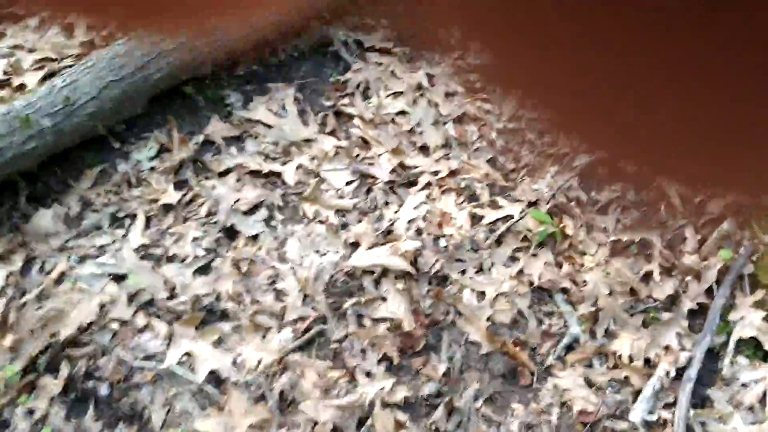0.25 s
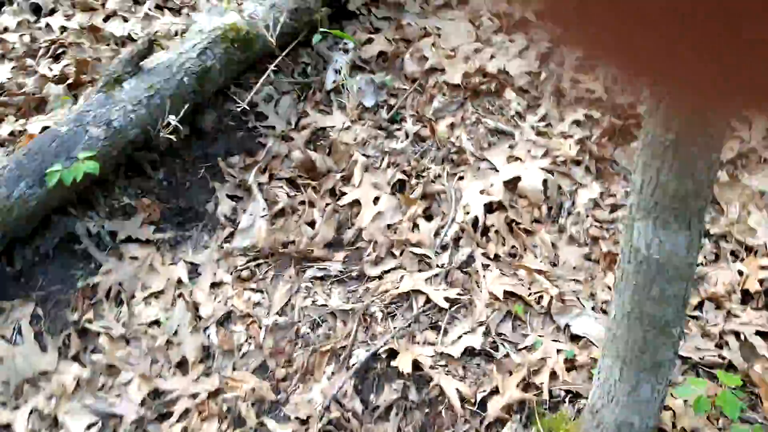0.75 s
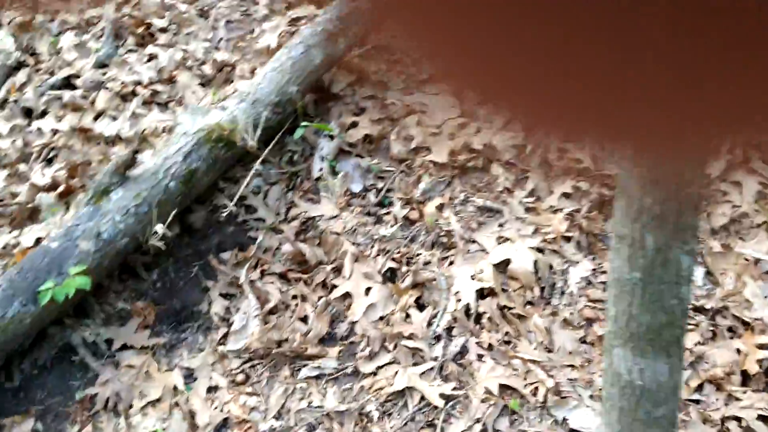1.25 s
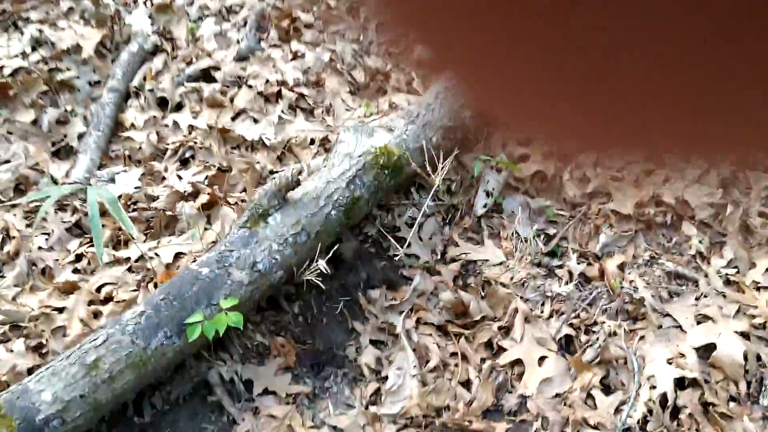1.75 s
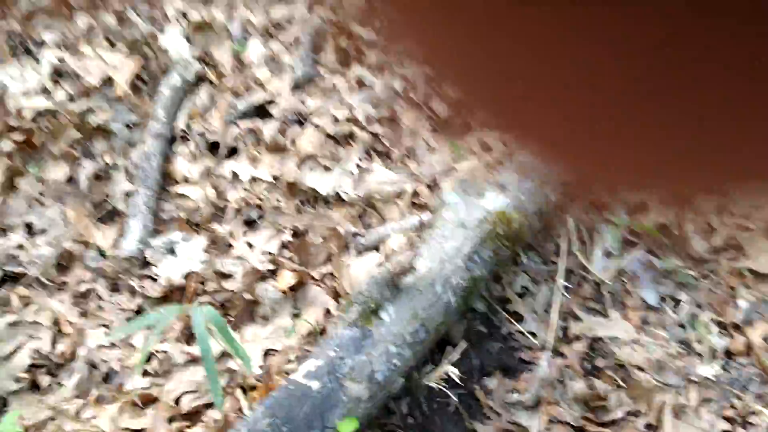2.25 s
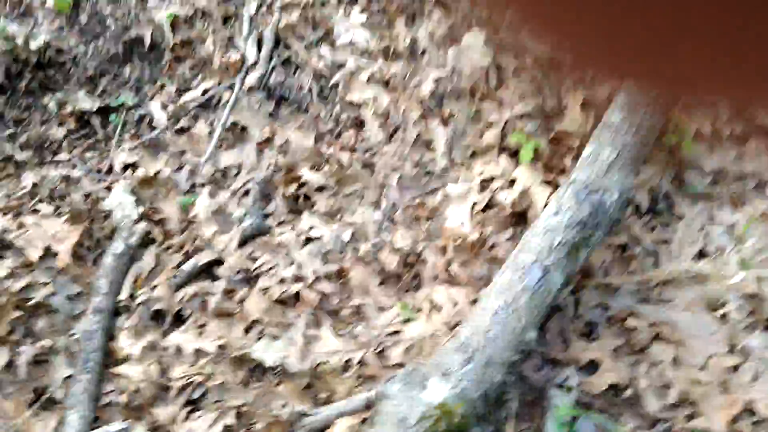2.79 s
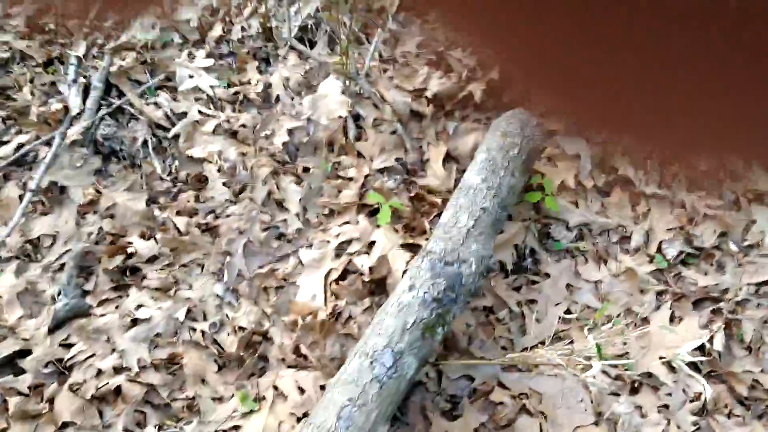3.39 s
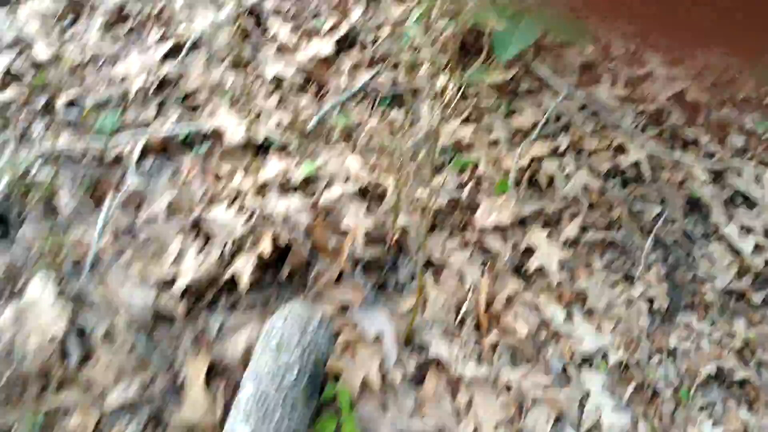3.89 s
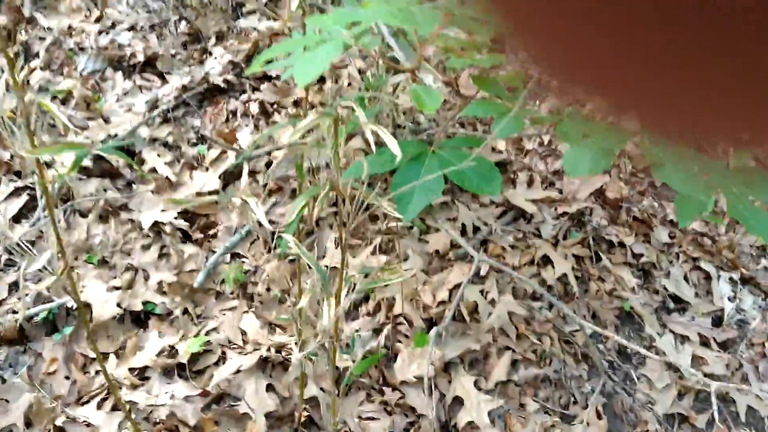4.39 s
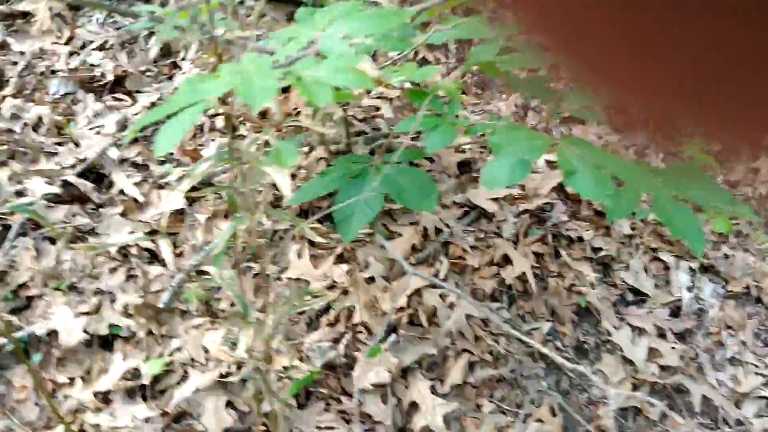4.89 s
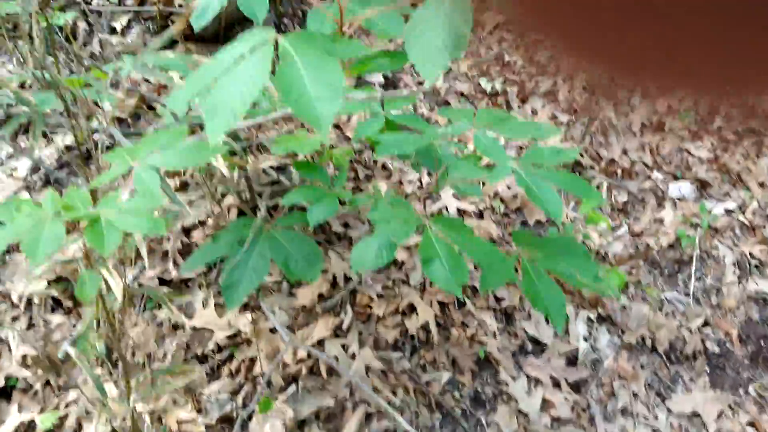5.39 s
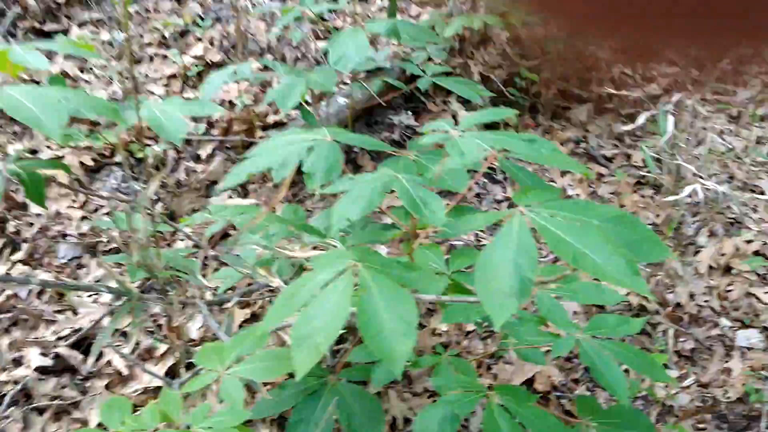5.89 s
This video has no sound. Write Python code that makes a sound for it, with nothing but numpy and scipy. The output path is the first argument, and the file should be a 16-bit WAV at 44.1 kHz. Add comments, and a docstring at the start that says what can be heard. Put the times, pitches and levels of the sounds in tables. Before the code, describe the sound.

In a quiet wood, a handheld stereo microphone closely catches footsteps in dry leaves. From 0 to 0.45 seconds there are only faint crackles and small snaps. At about 0.6 to 0.85 the loudest crunch bursts out in two or three dense surges, with a dull knock beneath. It eases through a softer crunch near 1.0 and dwindles by 1.4. From 1.6 to 2.1 a longer dragging crunch swells, with bright sharp snaps near 1.96, then fades. A short crunch comes at 2.65. After that, thin, fizzy rustles and ticks continue, with a small step and low thud at 3.6. A brief crisp crunch lands at 4.76, a dull knock at 5.07, then sparse crackling until about 6.1. Very faint low rumble, airy hiss and wavering distant hums stay underneath; the dry sound has only a tiny scattered tail.

```python
"""On a wooded slope, someone walks through dry leaf litter, holding a small pair of microphone ports.
Each step is a dense crackle of short noise bursts, with larger single snaps and dull shoe knocks on top.
A faint scattered tail follows the steps, and low rumble shakes with them.
Behind lie steady noise, for far rumble and the hiss of the wood, and faint wavering hums."""
import sys
import numpy as np
from scipy import signal
from scipy.fft import rfft, irfft
from scipy.io import wavfile
from scipy.ndimage import uniform_filter1d

SR = 44100
rng = np.random.default_rng(int(sys.argv[2]) if len(sys.argv) > 2 else 0)


def inscribe(sig):
    """Save sig as 16-bit PCM at rate SR to the path in sys.argv[1].

    A 1-D sig is mono; a 2-D sig holds one channel per row.
    Samples are clipped to [-1, 1] before scaling.
    """
    pcm = np.round(np.clip(np.atleast_2d(sig).T, -1, 1) * 32767)
    wavfile.write(sys.argv[1], SR, pcm.astype(np.int16))


def volts_from_decibels(level):
    """Turn decibel levels (scalar or array-like) into linear amplitude factors."""
    exponent = np.asarray(level, float) / 20
    return 10 ** exponent


N = 271126  # length in samples


def evened(x):
    """Scales a signal to an rms of 1."""
    return x / np.sqrt(np.mean(x ** 2) + 1e-20)


def read(points, hz):
    """Looks up a table of (Hz, value) on a log frequency axis."""
    table_hz, value = np.transpose(points)
    return np.interp(np.log(hz + 1), np.log(table_hz + 1), value)


def bump(hz, centre_hz, width):
    """A bell of height 1 on a log frequency axis; width is in natural-log units."""
    return np.exp(-(np.log((hz + 1) / centre_hz) / width) ** 2)


def partly_alike(first, second, share):
    """Mixes two independent noises into a left and right pair that share part of their sound."""
    return np.stack([first, share * first + np.sqrt(1 - share ** 2) * second])


# The colour of the steady background. Each row: frequency in Hz, relative level in dB per Hz.
WOOD_COLOUR = [(24, -30), (40, -10), (131, 1), (316, -2.5), (865, -7.5), (957, -11), (1030, -11.5),
               (1540, -14), (3830, -16.5), (5440, -24.5), (7010, -20), (15300, -38), (16500, -51)]
# How alike the background is left and right. Each row: frequency in Hz, likeness from 0 to 1.
WOOD_LIKENESS = [(60, 0.86), (200, 0.97), (600, 0.39), (1400, .1), (16000, 0.022)]


def wood(level_db=-68.5, patchy_db=2.0):
    """Steady rumble and hiss: noise shaped by frequency, near mono in the bass, slightly patchy."""
    frames, hz = N // 512 + 5, np.fft.rfftfreq(2048, 1 / SR)
    a, b, c, d, patches = rng.standard_normal((frames, 1025, 5)).T
    patches = uniform_filter1d(patches, 20, 0)  # smooth over frequency
    patches = evened(uniform_filter1d(patches, 12, 1))  # and over time
    z = partly_alike(a + 1j * b, c + 1j * d, read(WOOD_LIKENESS, hz)[:, None])
    z *= volts_from_decibels(read(WOOD_COLOUR, hz)[:, None] + patchy_db * patches)
    noise = signal.istft(z, nperseg=2048, noverlap=1536)[1][:, :N]
    lean = volts_from_decibels(np.array([[.7], [-.7]]))  # a little louder on the left
    return volts_from_decibels(level_db) * evened(noise) * lean


# Faint low tones, two steady like far engines and one that glides; one list of rows per tone.
# Each row: time in seconds, centre pitch in Hz, level in dB before the waver.
HUM_PATHS = [
    [(0.0, 97.6, -74), (0.13, 101.5, -76), (1.032, 103.2, -67.5), (1.3, 107, -85)],
    [(3.2, 148.4, -91), (3.342, 145.0, -80.5), (4.014, 149.3, -79.5), (4.9, 146.3, -82)],
    [(1.9, 337, -73), (2.012, 302.5, -68), (2.098, 434, -68), (2.42, 287.2, -91)],
]


def hums(waver_db=4.0, drift=.03):
    """Low sine tones whose level and pitch waver slowly; drift is a fraction of the pitch."""
    out, t = np.zeros(N), np.arange(N) / SR
    for rows in HUM_PATHS:
        s, hz, db = np.transpose(rows)
        fade = np.interp(t, [s[0] - .05, s[0], s[-1], s[-1] + .05], [0, 1, 1, 0])
        slow = uniform_filter1d(rng.standard_normal((2, N)), 1500, axis=1)
        slow = uniform_filter1d(slow, 900, axis=1)
        # both wavers share one scale
        level_waver, pitch_waver = evened(slow)
        pitch_hz = np.interp(t, s, hz) * (1 + drift * pitch_waver)
        tone = np.sqrt(2) * np.sin(2 * np.pi * np.cumsum(pitch_hz) / SR)
        out += fade * volts_from_decibels(np.interp(t, s, db) + waver_db * level_waver) * tone
    return out


# Each press or drag of a shoe. Each row: start of full weight in seconds, level in dB,
# rise in seconds, hold in seconds, fall in seconds. Rise and fall each span ramp_db.
SHOE_PRESSES = [(0.061, -57, .15, 0.0071, 0.084), (0.154, -57.5, 0.083, .0, 0.087),
                (0.301, -59, 0.14, 0.0082, 0.16), (0.598, -23, 0.078, 0.016, .07),
                (0.671, -29, 0.073, 0.014, 0.11), (0.782, -24.5, 0.13, .0, 0.16),
                (1.005, -40, 0.6, 0.093, 0.15), (1.166, -46.5, 0.077, .04, 0.097),
                (1.316, -48, .035, 0.0042, 0.053), (1.417, -49.5, 0.085, .0, 0.092),
                (1.626, -37, 0.097, 0.11, 0.1), (1.88, -35, 0.15, .0, 0.21), (1.974, -36.5, .15, .0, .2),
                (2.067, -35, 0.17, 0.035, 0.065), (2.156, -47, 0.11, .0, 0.051),
                (2.276, -46, 0.055, 0.0034, 0.1), (2.379, -54.5, 0.039, 0.0049, 0.093),
                (2.656, -39, 0.042, .0, 0.033), (2.707, -41, 0.082, 0.00051, 0.034),
                (2.497, -64, 0.15, 0.037, 0.15), (2.864, -54.5, 0.26, 0.03, 0.21),
                (2.94, -57.5, 0.12, 0.016, 0.11), (2.997, -56, 0.089, 0.041, 0.083),
                (3.251, -56.5, .03, 0.067, 0.14), (3.465, -64, 0.034, 0.005, .2),
                (3.608, -44, 0.1, 0.05, 0.031), (3.7, -53.5, 0.036, 0.015, 0.081),
                (3.771, -61.5, .1, 0.042, 0.072), (3.922, -58, 0.16, .1, 0.18),
                (4.178, -53.5, .1, .0, 0.087), (4.23, -60.5, 0.084, 0.015, 0.06),
                (4.762, -36, 0.044, .0, 0.059), (5.017, -52, 0.13, 0.18, .12), (5.254, -61, .1, 0, .2),
                (5.338, -63.5, 0.08, 0.017, 0.11), (5.428, -58.5, 0.16, 0.055, 0.052),
                (5.537, -61, .04, 0.018, 0.054), (5.72, -58.5, 0.047, 0.0052, 0.18),
                (5.813, -50.5, 0.14, 0.0044, 0.075), (5.889, -58.5, 0.084, 0.041, 0.2)]


def pressure(ramp_db=20, settle_db=-74):
    """Crushing level in dB: presses ramp up, hold and ramp down; powers add to the settling litter."""
    t = np.arange(N // 64 + 2) * 64 / SR
    power = volts_from_decibels(settle_db) ** 2
    for at, db, rise, hold, fall in SHOE_PRESSES:
        early = np.maximum(at - t, 0) / rise
        late = np.maximum(t - at - hold, 0) / fall
        power = power + volts_from_decibels(db - ramp_db * (early + late)) ** 2
    return np.interp(np.arange(N) / SR, t, 10 * np.log10(power))


def jolts(level_db=-76, follow=0.5):
    """Steps shake the hand: low noise follows the smoothed pressure, partly its own at each port."""
    shake_db = uniform_filter1d(pressure(), 4000)
    noise = rng.standard_normal((3, N))
    low_band = signal.butter(2, [55, 130], "band", fs=SR, output="sos")
    low = signal.sosfilt(low_band, noise[:2] + 0.96 * noise[2])
    lean = volts_from_decibels(np.array([[2.5], [-2.5]]))  # louder on the left
    # level_db holds where the smoothed pressure is -53.5 dB
    return evened(low) * volts_from_decibels(level_db + follow * (shake_db + 53.5)) * lean


# How fast the scatter dies. Each row: frequency in Hz, time to fall by 60 dB in seconds.
SCATTER_DECAY = [(300, 0.051), (2000, 0.048), (8000, 0.081), (16000, 0.036)]
# How alike one break, or its scatter, is at the two ports. Each row: frequency in Hz, likeness 0 to 1.
PORT_LIKENESS = [(500, 0.93), (1500, 0.91), (3500, 0.71), (10000, 0.29)]


def trees(x):
    """Faint scatter from litter and trunks: sparse taps that die by band, alike in the bass."""
    taps = rng.choice([-1., 1.], (2, SR // 4)) * (rng.random((2, SR // 4)) < .05)
    hz, t, z = signal.stft(taps, SR, nperseg=128)
    z = partly_alike(z[0], z[1], read(PORT_LIKENESS, hz)[:, None])
    z *= volts_from_decibels(-60 * t / read(SCATTER_DECAY, hz)[:, None])
    tail = signal.istft(z, SR, nperseg=128)[1]
    tail = np.pad(tail, ((0, 0), (100, 0)))  # the scatter comes 100 samples late
    return signal.fftconvolve(x, tail / np.linalg.norm(tail[0]), axes=1)[:, :N]


# The shoe knocks on wood or soil.
# Each row: start in seconds, level in dB before the decay and filter, pitch in Hz.
SHOE_KNOCKS = [(0.044, -52.5, 500), (0.608, -47, 450), (2.094, -46.5, 430), (3.648, -49, 151),
               (4.77, -54, 452), (5.074, -38.5, 360)]


def knocks(decay_s=0.0036):
    """A dull low blow: two sines that die within milliseconds, the second about an octave lower."""
    out, t = np.zeros(N + 2000), np.arange(2000) / SR
    for at, db, hz in SHOE_KNOCKS:
        ring = np.sin(2 * np.pi * hz * t) + .5 * np.sin(2 * np.pi * 0.46 * hz * t)
        attack = np.minimum(t / 0.00051, 1)
        out[round(at * SR):][:2000] += volts_from_decibels(db) * ring * np.exp(-t / decay_s) * attack
    return signal.sosfilt(signal.butter(2, 110, "high", fs=SR, output="sos"), out[:N])


# The colour of breaking leaves. Each row: frequency in Hz, relative level in dB per Hz.
LEAF_COLOUR = [(88, -48), (150, -25.5), (460, -20), (594, -22), (847, -11.5), (1620, -5.5), (1750, -5),
               (1930, -2), (2980, -3), (3930, -2), (5930, -2.5), (8450, 0), (13000, -5.5), (15300, -9),
               (16500, -24)]
# The hand shades the right port. Each row: frequency in Hz, left minus right in dB.
HAND_SHADOW = [(60, -6), (130, -1), (290, 0), (640, 0), (1410, 4), (3100, 9.5), (6820, 4.5), (15000, -1.5)]


def leaf_db(hz, body_db, fizz_db, pan_db):
    """Spectrum of breaking leaves at both ports: low body, high fizz and side tilt a common colour."""
    low = read([(1500, 1), (2600, 0)], hz)
    high = read([(4800, 0), (6300, 1), (9500, 0.66), (12500, 1.0)], hz)
    # only a part of pan_db is heard, more of it in the treble
    side = read(HAND_SHADOW, hz) + pan_db * read([(400, 0.025), (1500, 0.24)], hz)
    mid = read(LEAF_COLOUR, hz) + low * body_db + high * fizz_db
    return np.array([mid + side / 2, mid - side / 2])


def cracks(rings_hz, fast_scale_s, slow_scale_s, ring_db):
    """Short bursts for both ports: treble starts and dies first; each has its own ring and direction."""
    t = np.arange(512) / SR
    hz = np.fft.rfftfreq(512, 1 / SR)
    noise = rfft(rng.standard_normal((len(rings_hz), 2, 512)))
    length, place = rng.random((len(rings_hz), 2, 1, 1)).swapaxes(0, 1)
    pair = partly_alike(noise[:, 0], noise[:, 1], read(PORT_LIKENESS, hz)).swapaxes(0, 1)
    pair *= volts_from_decibels(ring_db * bump(hz, rings_hz[:, None, None], .25))
    treble = 1 / (1 + (5500 / (hz + 1)) ** 4)
    # every burst draws its own length
    fast, slow = fast_scale_s * (0.19 + length), slow_scale_s * (0.9 + length)
    quick = irfft(pair * np.sqrt(treble)) * np.exp(-t / fast) / np.sqrt(fast)
    swell = t / slow * np.exp(-2 * t / slow)
    late = irfft(pair * np.sqrt(1 - treble)) * swell * 4 / np.sqrt(slow)
    attack = np.minimum(t / 0.00028, 1)
    # the left port hears it later, by a path difference in samples
    lag = 4 + (9 * place + 0.59) * np.array([[1], [0]])
    burst = irfft(rfft((quick + late) * attack) * np.exp(-2j * np.pi * hz * lag / SR))
    return burst / np.sqrt((burst ** 2).sum((1, 2), keepdims=True))


# Single leaves and twigs breaking. Each row: start in seconds, level in dB before gain_db,
# ring in Hz, lean to the left in dB (taken from its median and weakened in leaf_db).
LEAF_SNAPS = [(0.0475, -23, 3260, -7), (0.093, -26, 11000, 7), (0.125, -30, 2890, 22),
              (0.1429, -19.5, 8140, 19), (0.186, -37.5, 3160, 20), (0.22, -34.5, 2000, 18),
              (0.2968, -31, 6800, 17), (0.4181, -36, 3300, -3), (0.5, -27, 7500, 3), (0.6688, -8, 4170, 11),
              (0.7262, -10.5, 3040, 15), (0.9888, -18, 1624, -4), (1.1548, -16, 2720, 9),
              (1.2002, -26, 7200, 34), (1.3105, -24, 3005, 6), (1.5316, -38, 7540, -11),
              (1.6177, -16, 3200, 18), (1.7624, -14, 2950, 11), (1.837, -15, 7500, -8),
              (1.8684, -18.5, 3660, -4), (1.9641, -6, 8550, 28), (1.9989, -11, 4900, -4),
              (2.063, -17, 6430, 2), (2.154, -18.5, 3340, 24), (2.1818, -21.5, 8000, 17),
              (2.2598, -28.5, 2720, 1), (2.4047, -32, 6800, 6), (2.447, -38.5, 2880, 20),
              (2.633, -29, 8500, 8.5), (2.721, -25, 8900, 8), (2.867, -26, 2320, 21),
              (2.8988, -31, 8600, 9), (2.926, -33.5, 8100, -4), (2.995, -27.5, 7660, 10),
              (3.018, -28, 8660, 10), (3.05, -28.5, 7900, 5), (3.223, -37.5, 8000, -1),
              (3.253, -41, 8440, 13), (3.498, -38, 4050, 19), (3.6215, -33, 7700, 6),
              (3.651, -21, 7800, 20), (3.872, -33.5, 8140, 17), (3.9154, -31, 8100, 8),
              (3.9447, -25, 8360, -5), (4, -34.5, 8320, 6.5), (4.0613, -29.5, 7880, -2),
              (4.1066, -28, 6630, -5), (4.4005, -51, 2600, 16), (4.4326, -39, 2800, -2),
              (4.5014, -37, 4400, -7), (4.712, -41, 7810, 14), (4.7426, -21, 7800, 12),
              (4.8209, -22.5, 10800, 8), (4.918, -34, 3880, 16), (4.989, -32, 11200, -18),
              (5.006, -33, 9290, -4), (5.0746, -21.5, 9830, 15), (5.1201, -20.5, 9100, 3),
              (5.1378, -22.5, 9330, -8), (5.1921, -23.5, 9100, -3), (5.2722, -29.5, 8160, 5),
              (5.391, -37, 8330, -5), (5.6368, -27.5, 8400, 9), (5.6625, -47, 8000, 0),
              (5.7795, -31, 7670, -4), (5.813, -37, 7700, 1), (5.92, -27.5, 7700, -3),
              (5.9613, -28, 7900, 12), (6.035, -37.5, 3160, 0)]


def snaps(gain_db=-3.5):
    """Each larger break is one crack with its own ring and side."""
    s, level_db, ring_hz, pan_db = np.transpose(LEAF_SNAPS)
    shapes = cracks(ring_hz, fast_scale_s=0.00074, slow_scale_s=0.0018, ring_db=11.5)
    hz, out = np.fft.rfftfreq(1024, 1 / SR), np.zeros((2, N + 1024))
    pan_db = (pan_db - np.median(pan_db))[:, None]
    colour = volts_from_decibels(leaf_db(hz, -0.2, 2.5, pan_db)).swapaxes(0, 1)
    shapes = np.pad(shapes, ((0, 0), (0, 0), (64, 448)))  # room for the filter on both sides
    shapes = irfft(rfft(shapes) * colour)
    for at, db, shape in zip(s, level_db, shapes):
        i = round(at * SR) - 64
        out[:, i:i + 1024] += shape * volts_from_decibels(db + gain_db) / np.sqrt((shape ** 2).sum() / 80)
    return out[:, :N]


# Slow colour as the litter and the grip change. Each row: time in seconds, treble level in dB
# (taken from its median), low ring in Hz, high ring in Hz, ring strength in dB.
LITTER_COLOUR = [(0.0, 4, 3200, 6860, 13), (0.43, 1, 3060, 8800, 3), (0.94, 1.5, 3700, 8000, 4),
                 (1.15, 2.5, 2960, 6500, 8.5), (1.4, 0.5, 3150, 8100, 2), (1.8, 3.5, 3300, 7600, 4),
                 (2.0, 1.5, 3900, 8300, 3.5), (2.33, 5, 3200, 7170, 2.5), (2.76, 2, 3540, 9300, 3.5),
                 (2.84, 2, 2570, 8200, 3.5), (3.06, 1.5, 3000, 8000, 3.5), (3.26, 2.5, 2200, 6340, 5.5),
                 (3.39, 3.5, 2360, 6400, 7), (3.5, 1, 3700, 7710, 5), (3.97, 11.5, 3170, 8040, 7.5),
                 (4.15, 12, 3650, 6670, 8), (4.45, 5, 2940, 6900, 6.5), (4.76, 5, 3400, 8000, 5),
                 (5.02, 6.5, 3930, 9230, 6), (5.45, 7, 3400, 8040, 8), (5.91, 10, 2930, 7800, 9),
                 (6.15, -5, 3120, 7700, 9.5)]
# Slow lean of the crunch. Each row: time in seconds, level of the low body in dB,
# lean to the left in dB (both taken from their medians, the lean weakened in leaf_db).
CRUNCH_LEAN = [(0, 9.5, 7), (0.45, -3, 8), (1.0, 0, 3.5), (1.7, 1, 4), (2.1, -4.5, 3.5), (2.7, -0.5, 10.5),
               (3.1, -6.5, -1), (3.6, 0, 10), (4.1, 0.5, 1.5), (4.76, 3.5, 5), (5.1, -3.5, -3), (5.8, 3, 7),
               (6.15, 7.5, 5)]


def crackle(per_s=1500, spread_db=4.5, clump=0.22, brush_db=-3.5, fuse=0.2, body_per_press=0.033,
            gain_db=-0.25):
    """Distinct breaks over a dense brushing of leaf on leaf, coloured by leaf size and by the hand."""
    press_db = pressure()
    clumps = uniform_filter1d(rng.standard_normal(N), 150)
    clumps = evened(uniform_filter1d(clumps, 100))
    # a few random samples start a break, small ones more often than large
    breaks = volts_from_decibels(spread_db * np.minimum(rng.exponential(1, N), 3.2))
    breaks = evened(breaks * (rng.random(N) < per_s / SR))
    # under a hard press the breaks fuse: the brushing gains fuse dB per dB of pressure above -53
    brush = volts_from_decibels(brush_db + fuse * (press_db + 53))
    size = (breaks + brush * rng.standard_normal(N)) / np.sqrt(1 + brush ** 2)
    size *= np.exp(clump * clumps)

    # each sample sounds one of 90 burst shapes
    which = rng.integers(0, 90, N)
    shapes = cracks(np.geomspace(1500, 13000, 90), fast_scale_s=0.0006, slow_scale_s=.0016, ring_db=14.5)
    x = np.zeros((2, N))
    for k in range(90):
        x += signal.oaconvolve((size * (which == k))[None], shapes[k], axes=1)[:, :N]

    hz, t, z = signal.stft(x, SR, nperseg=512, noverlap=384)
    z /= np.sqrt((abs(z) ** 2).mean(2, keepdims=True))  # the many breaks together have a smooth spectrum
    at, *columns = np.transpose(LITTER_COLOUR)
    fizz_db, low_hz, high_hz, ring_db = (np.interp(t, at, c) for c in columns)
    at, *columns = np.transpose(CRUNCH_LEAN)
    body_db, pan_db = (np.interp(t, at, c) for c in columns)
    # the low body grows with pressure, in dB per dB
    body_db = body_db + body_per_press * np.interp(t * SR, np.arange(N), press_db)
    tone = [c - np.median(c) for c in (body_db, fizz_db, pan_db)]
    # two rings with a dip between them
    rings = bump(hz[:, None], low_hz, .22) + bump(hz[:, None], high_hz, .16)
    rings -= .6 * bump(hz[:, None], 5300, .1)
    z *= volts_from_decibels(leaf_db(hz[:, None], *tone) + ring_db * rings)

    # the band from 2 to 5.5 kHz, both ports averaged, sets the overall level
    band = abs(z[:, (hz > 2000) & (hz < 5500)].mean(0)) ** 2
    z /= np.sqrt(band.sum(0).mean() * 4 / 3)
    x = signal.istft(z, SR, nperseg=512, noverlap=384)[1][:, :N]
    return x * volts_from_decibels(press_db + gain_db)


def scene():
    """Adds the steps, their scatter and the background."""
    steps = crackle() + snaps() + knocks()
    return steps + volts_from_decibels(-14.5) * trees(steps) + jolts() + wood() + hums()


def band_limit(x):
    """A steep low-pass at the top of the band."""
    return signal.sosfilt(signal.butter(12, 16990, fs=SR, output="sos"), x)


def record(dry):
    """Cuts the treble steeply at 15950 Hz and finishes the mix."""
    edge = signal.firwin(767, 15950, window=("kaiser", 8), fs=SR)
    mix = signal.oaconvolve(dry, edge[None], "same", axes=1)
    return band_limit(mix)


dry = scene()
out = record(dry)
inscribe(out)
```